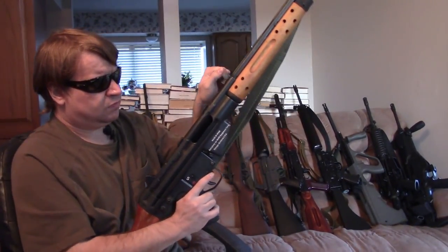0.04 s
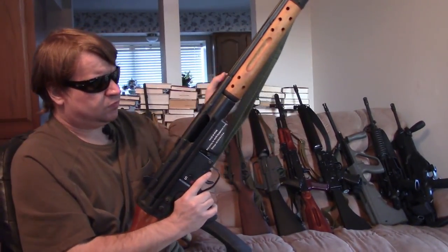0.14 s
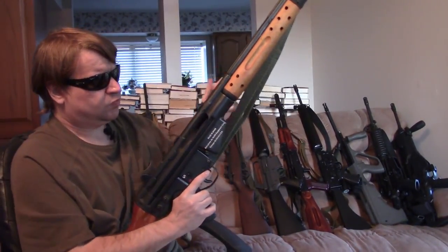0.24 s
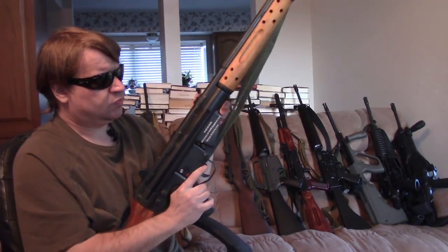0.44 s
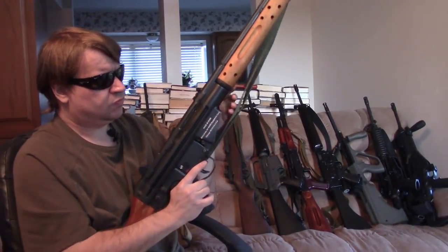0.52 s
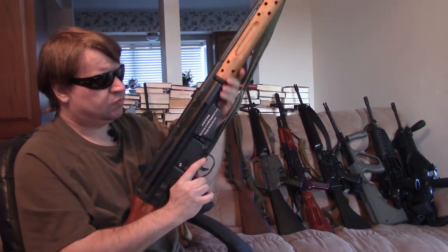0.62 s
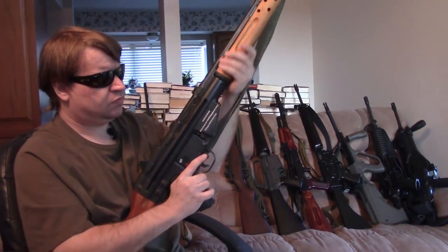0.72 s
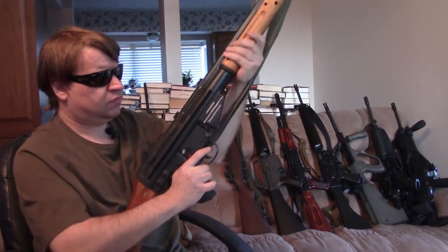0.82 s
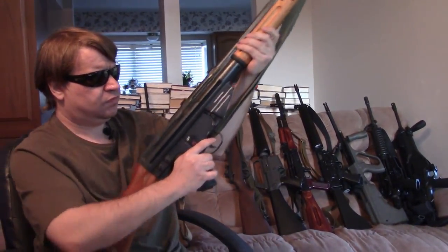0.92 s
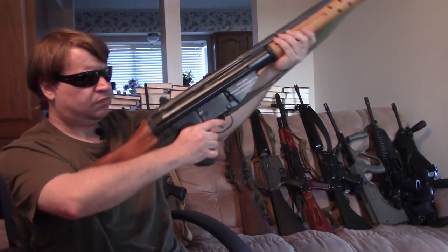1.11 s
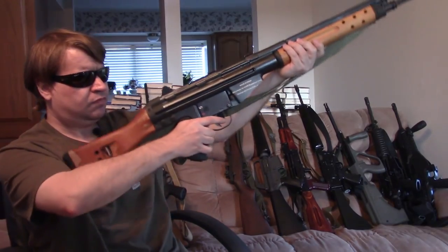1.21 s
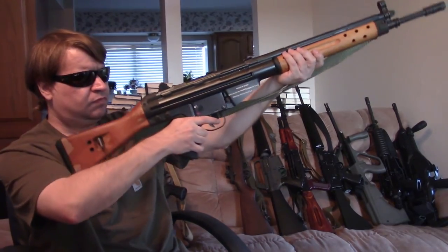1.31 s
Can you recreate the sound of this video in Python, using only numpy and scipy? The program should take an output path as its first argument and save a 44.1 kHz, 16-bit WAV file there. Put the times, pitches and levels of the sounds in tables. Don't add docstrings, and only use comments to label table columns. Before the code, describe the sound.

Close, nearly mono capture of a rifle action snapping shut indoors; clicks and scraping run into a hard clank, the level ducks sharply with low thumps, the room wash swells back and dies, then a sleeve rustles softly.

```python
import sys
import numpy as np
from scipy import signal
from scipy.fft import rfft, irfft
from scipy.io import wavfile
from scipy.ndimage import uniform_filter1d

SR = 44100
rng = np.random.default_rng(int(sys.argv[2]) if len(sys.argv) > 2 else 0)


def gain_from_db(level_db):
    decades = np.asarray(level_db, float) / 20
    return 10 ** decades


def transcribe(u):
    v = np.clip(np.atleast_2d(u).T, -1, 1)
    q = np.round(v * 32767).astype(np.int16)
    wavfile.write(sys.argv[1], SR, q)


N = 59535

# [t/s, peak level/dB, tube over receiver/dB, hold/s, loudest receiver f/Hz]
KNOCKS = [(.154, -29.5, -22, .006, 1230), (0.167, -19, -2, 0.0098, 1260),
          (.182, -24.5, -10.5, 0.0042, 1105), (0.2067, -0.5, -8, 0.0037, 1136),
          (0.214, -14, -19, 0.0089, 1145), (0.272, -7.5, -1.5, 0.0016, 1240),
          (.284, -10.5, 9, 0.0099, 1190), (0.2918, -3, 7.5, 0.006, 1220), (0.2963, -4, -10.5, 0.0035, 718),
          (0.3008, -1.5, -2.5, 0.0078, 895), (0.31, -13, -10, 0.0032, 1200),
          (0.314, -20.5, -6, 0.0065, 1300), (0.3219, 3, -8, .0045, 1310), (0.3304, -0.5, -22, 0.0026, 950),
          (0.336, -3, -0.5, .004, 637), (.346, -5, -9.5, .004, 500)]
# [f/Hz, level/dB, width/Hz]
RECEIVER_MODES = [(484, -3, 100), (655, -1, 120), (820, -4.5, 120), (1053, -1.5, 63), (1196, 2, 78),
                  (1433, -1, 91)]
# [f/Hz, level/dB, width/Hz]
TUBE_MODES = [(1826, 0, 250), (2361, 1.5, 210), (2736, -3, 160), (3580, -12, 110), (4173, -9.5, 260),
              (5610, -11, 630), (6660, -15, 390), (8100, -25, 590), (11500, -27, 2300)]
RING_CUT_T60_S = 0.014
SLAM_S = 0.336


def evened(x):
    return x / np.sqrt(np.mean(x ** 2) + 1e-20)


def noise():
    return rng.standard_normal(N)


def read(points, hz):
    f, value = np.transpose(points)
    return np.interp(np.log(hz + 1), np.log(f + 1), value)


def curve(table, index=1):
    rows = np.array(table)
    return np.interp(np.arange(N) / SR, rows[:, 0], rows[:, index])


def coloured(x, points):
    gain = gain_from_db(read(points, np.fft.rfftfreq(len(x), 1 / SR)))
    return irfft(rfft(x) * gain, len(x))


def body(x, modes):
    out = np.zeros(len(x))
    for k, (hz, db, width_hz) in enumerate(modes):
        r = np.exp(-np.pi * width_hz / SR)
        poles = [1, -2 * r * np.cos(2 * np.pi * hz / SR), r * r]
        out += (-1) ** k * gain_from_db(db) * signal.lfilter([1 - r, 0, r - 1], poles, x)
    return out


def floor():
    # [f/Hz, level/dB per Hz]
    rumble_colour = [(20, -7.5), (60, 0), (150, -2.5), (330, -13.5), (600, -18.5), (1200, -26), (4000, -41),
                     (15800, -48)]
    # [f/Hz, width/Hz, level/dB]
    hum = [(211, 28, -56), (305, 13, -52), (401.6, 7.5, -57)]
    lumps = gain_from_db(1.8 * evened(uniform_filter1d(noise(), size=2500)))
    rumble = gain_from_db(-41.5) * lumps * evened(coloured(noise(), rumble_colour))
    drone = sum(gain_from_db(db) * evened(body(noise(), [(hz, 0, width_hz)])) for hz, width_hz, db in hum)
    return rumble + drone


def scrape():
    # [t/s, level/dB, brightness/dB]
    strokes = [(.07, -83, -15), (.085, -48.5, -5.5), (.1, -50, -12), (.11, -66.5, -5.5), (.135, -54.5, -1),
               (.16, -40.5, -8.5), (.175, -27.5, -12.5), (.2, -41, 2), (.225, -28.5, -1), (.25, -32.5, 2.5),
               (.268, -40, 2.5), (.276, -22.5, -2.5), (.31, -21.5, 4), (.349, -21.5, 2.5), (.353, -46, 2),
               (.365, -92, 5)]
    hiss_colour = [(500, -13.5), (3000, -10.5), (6500, -8), (10000, -13.5), (15000, -28)]
    slips_per_s, slip_spread_db = 5000, 4
    level_db = curve(strokes)
    size = gain_from_db(slip_spread_db * np.minimum(rng.exponential(1, N), 4))
    slips = size * (rng.random(N) < slips_per_s / SR) * rng.choice([-1., 1.], N)
    hiss_db = -10.5 + 1.03 * (level_db + 22)
    hiss = gain_from_db(hiss_db) * evened(coloured(noise(), hiss_colour))
    low = evened(body(slips, RECEIVER_MODES[2:]))
    high = evened(body(slips, TUBE_MODES)) + hiss
    return gain_from_db(level_db) * (low + gain_from_db(curve(strokes, index=2)) * high)


def knocks():
    damping = 0.3
    reach_oct, soften_per_db = 0.25, 0.34
    out, t = np.zeros(N), np.arange(3000) / SR
    hz, mode_db, width_hz = np.transpose(RECEIVER_MODES + TUBE_MODES)[:, :, None]
    low = np.arange(len(hz))[:, None] < len(RECEIVER_MODES)
    chances = rng.standard_normal((len(KNOCKS), 3, len(hz), 1))
    for (s, db, tube_db, hold_s, spot_hz), chance in zip(KNOCKS, chances):
        spot_db = -6.0 * (np.log2(hz / spot_hz) / reach_oct) ** 2
        share_db = np.where(low, spot_db, tube_db) + 1.2 * chance[0]
        decay = np.exp(-np.pi * damping * width_hz * t)
        swing = np.sin(2 * np.pi * hz * (1 + chance[1] / 100) * t + chance[2])
        modes = gain_from_db(mode_db + share_db) * decay * swing
        rise_s = hold_s * np.clip(-soften_per_db * (db + 5.0), 0.05, 0.7)
        cut = gain_from_db(-60 * np.maximum(t - hold_s, 0) / RING_CUT_T60_S)
        ring = modes.sum(axis=0) * np.minimum(t / rise_s, 1) * cut
        out[round(s * SR):][:3000] += gain_from_db(db) * ring / abs(ring).max()
    return out


def cracks():
    # [f/Hz, level/dB per Hz]
    crack_colour = [(1500, -28.5), (3000, 6.5), (6000, -1.5), (10000, -12.5), (15000, -16)]
    t, shape = np.arange(N) / SR, np.zeros(N)
    for s, db, _, hold_s, _ in KNOCKS:
        decay_db = -60 * np.maximum(t - s - 0.33 * hold_s, 0) / RING_CUT_T60_S
        shape += gain_from_db(db + decay_db) * (t > s) * gain_from_db(0.5 * db)
    return gain_from_db(-18) * shape * evened(coloured(noise(), crack_colour))


def room(x):
    # [f/Hz, t60/s]
    band_t60 = [(200, 0.39), (1000, 0.56), (3000, 0.6), (6000, 0.56), (10000, 0.41), (15000, 0.32)]
    taps = np.zeros((2, SR))
    at = np.arange(200, SR - 10, 10) + rng.integers(0, 10, (2, (SR - 201) // 10))
    np.put_along_axis(taps, at, rng.choice([-1., 1.], at.shape), 1)
    hz, t, z = signal.stft(taps, SR, nperseg=256)
    decay = gain_from_db(-60 * t / read(band_t60, hz)[:, None])
    tail = signal.istft(z * decay, SR, nperseg=256)[1]
    return signal.fftconvolve(x[None], tail / np.linalg.norm(tail[0]), axes=1)[:, :N]


def thumps():
    # [t/s, peak level/dB, f/Hz, t60/s]
    jolts = [(0.169, -24.5, 58.4, 0.055), (.208, -10, 45, 0.17), (.29, -24, 160, .05),
             (0.3399, 1, 123, 0.043), (0.343, -7.5, 32, 0.3), (0.3455, -12, 222, 0.048),
             (0.441, -19.5, 90, 0.032), (0.483, -7.5, 97, 0.022), (0.488, -23, 35, .12),
             (0.527, -8, 80.6, 0.032), (0.574, -18, 61, 0.043), (0.631, -25, 45.2, 0.29),
             (.73, -26, 61, 0.22), (0.828, -29, 66.7, 0.12), (.885, -33.5, 68, 0.093)]
    out, t = np.zeros(N), np.arange(SR // 3) / SR
    for s, db, hz, t60_s in jolts:
        out[round(s * SR):][:len(t)] -= gain_from_db(db - 60 * t / t60_s) * np.sin(2 * np.pi * hz * t)
    return out


def slam():
    # [f/Hz, level/dB per Hz]
    blow_colour = [(120, -11), (300, -12.5), (600, -11), (1180, -5.5), (1600, -8), (3000, -6), (5800, -8.5),
                   (15800, -26)]
    # [f/Hz, width/Hz, level/dB]
    steel_ring = [(1168, 52, 6), (1762, 18, 7.5), (2120, 70, 0), (2612, 47, 10.5), (3180, 36, -9),
                  (3950, 40, -28), (5280, 130, 0.5), (5670, 120, -17), (6120, 120, -0.5)]
    slam_db, rise_s, ring_db = 7.5, 0.0031, -10
    late_db, late_t60_s = -28.5, 0.99
    t = np.arange(N) / SR - SLAM_S
    blow = 1. * (np.arange(N) == round(SLAM_S * SR))
    ring = body(blow, [(hz, db, width_hz) for hz, width_hz, db in steel_ring])
    wash = room(coloured(blow, blow_colour) + gain_from_db(ring_db) * ring)
    wash = wash / np.sqrt(np.max(uniform_filter1d(wash[0] ** 2, size=2000)))
    late = evened(coloured(noise(), blow_colour)) * gain_from_db(late_db - 60 * abs(t) / late_t60_s)
    return gain_from_db(slam_db) * (wash + late) * np.clip(t / rise_s, 0, 1)


def linger():
    # [f/Hz, level/dB, t60/s]
    barrel = [(2116, -40, 1.08), (3810, -36.5, 1.11), (3000, -42, 0.82), (4300, -41.5, .9)]
    t, out = np.arange(N) / SR - SLAM_S, np.zeros(N)
    for hz, db, t60_s in barrel:
        tone = evened(body(noise(), [(hz, 0, 14.)]))
        out += gain_from_db(db + 10 - 60 * abs(t) / t60_s) * (t > 0) * tone
    return out


def sleeve():
    # [t/s, level/dB]
    strokes = [
        (1.16, -73),
        (1.19, -53),
        (1.225, -48),
        (1.25, -48.5),
        (1.268, -65),
        (1.3, -65),
        (1.35, -59),
    ]
    # [f/Hz, level/dB per Hz]
    cloth_colour = [(1200, -9), (1800, -2.5), (2600, -6.5), (6000, -6), (9000, -13), (12000, -22),
                    (15000, -56)]
    grain = gain_from_db(0.56 * evened(uniform_filter1d(noise(), size=150)))
    cloth = evened(coloured(noise(), [(400, -49)] + list(cloth_colour)))
    return gain_from_db(curve(strokes)) * grain * cloth


def scene():
    # [t/s, gain/dB]
    limiter = [(.0, -1.5), (.15, -1.5), (.21, 9), (.26, 1), (.3, 15), (.34, -21), (.354, -31),
               (.375, -19.5), (.395, -20.5), (.42, -14), (.5, -4.5), (.56, -0.4), (.6, -0.73)]
    # [f/Hz, side over mid/dB]
    side_colour = [(30, -43), (250, -31.5), (600, -32), (4000, -24), (8000, -24), (13000, -15)]
    knock_wet_db, side_hiss_db, lean = -17.5, -65, -0.012
    gain = gain_from_db(curve(limiter))
    near = knocks() + scrape()
    wash = gain * slam() + gain_from_db(knock_wet_db) * room(near)
    mid = near + wash[0] + thumps() + sleeve() + gain * floor()
    spread = coloured(wash[1] + near + gain * floor(), side_colour)
    side = lean * mid + spread + gain_from_db(side_hiss_db) * gain * noise()
    mid = mid + cracks() + gain * linger()
    return np.array([mid + side, mid - side])


def top_cut(x):
    return signal.sosfilt(signal.butter(12, 15990, fs=SR, output="sos"), x)


def record(dry):
    ceiling, edge_hz = 0.95, 15900
    capped = dry / (1 + abs(dry / ceiling) ** 6) ** (1 / 6)
    mix = signal.oaconvolve(capped, signal.firwin(255, edge_hz, fs=SR)[None], "same")
    return top_cut(mix)


dry = scene()
out = record(dry)
transcribe(out)
```